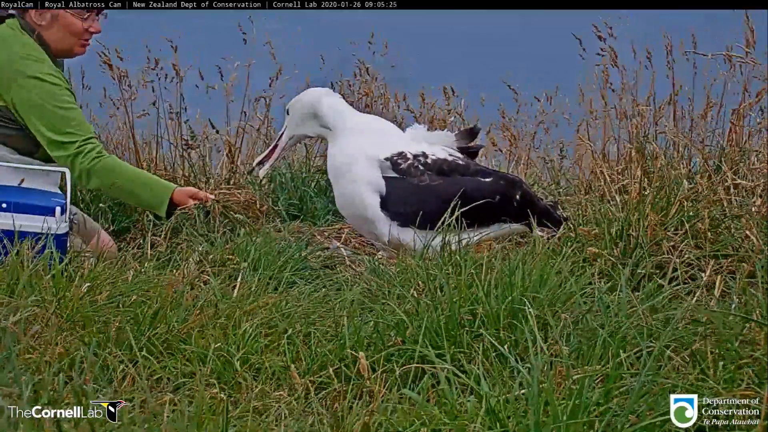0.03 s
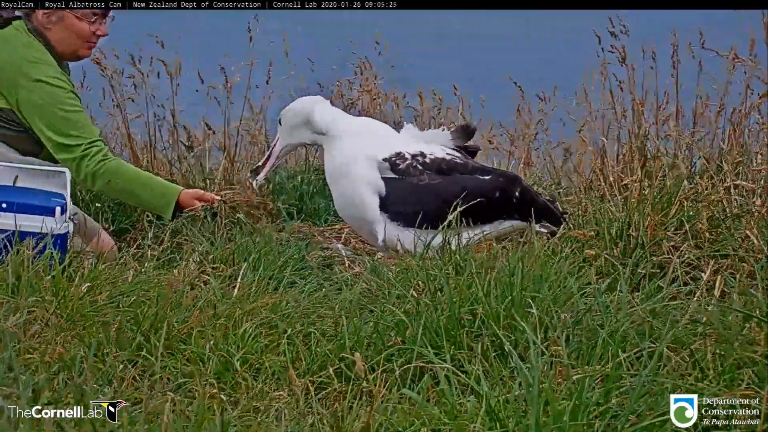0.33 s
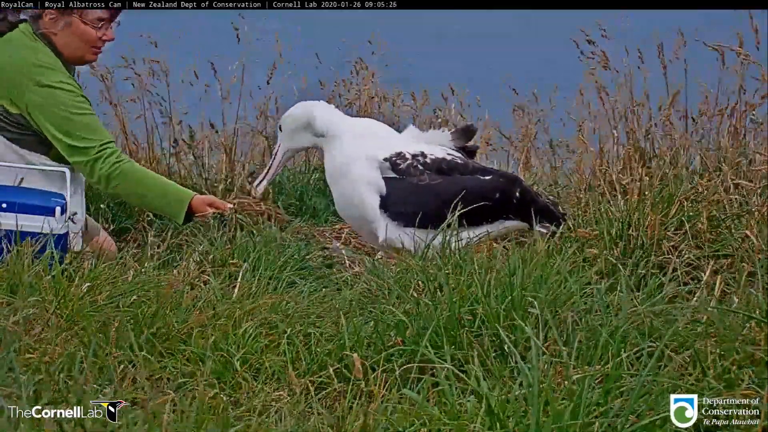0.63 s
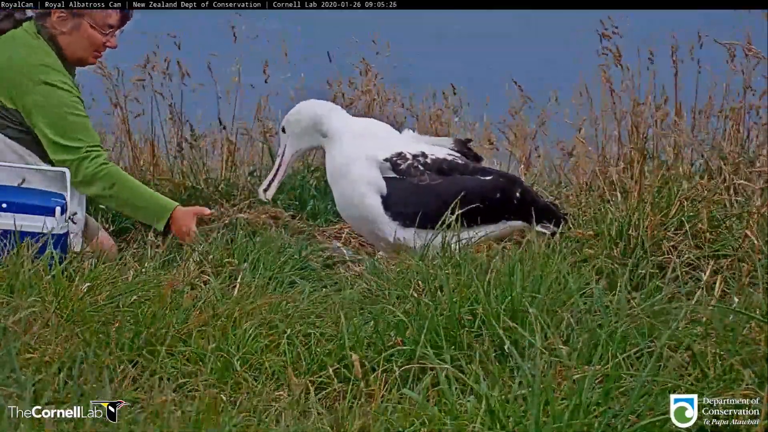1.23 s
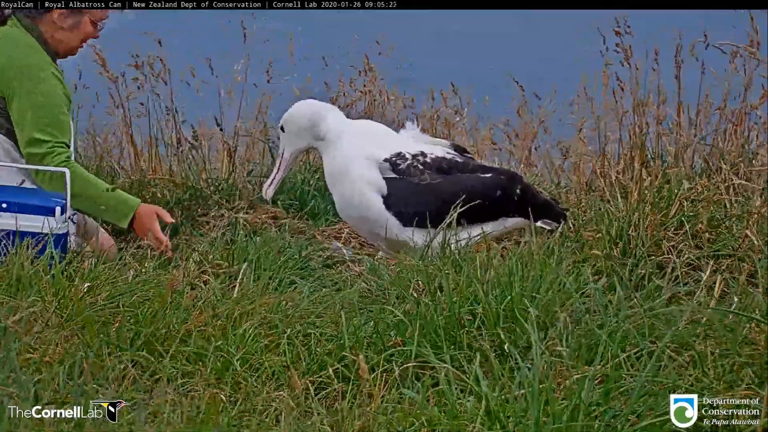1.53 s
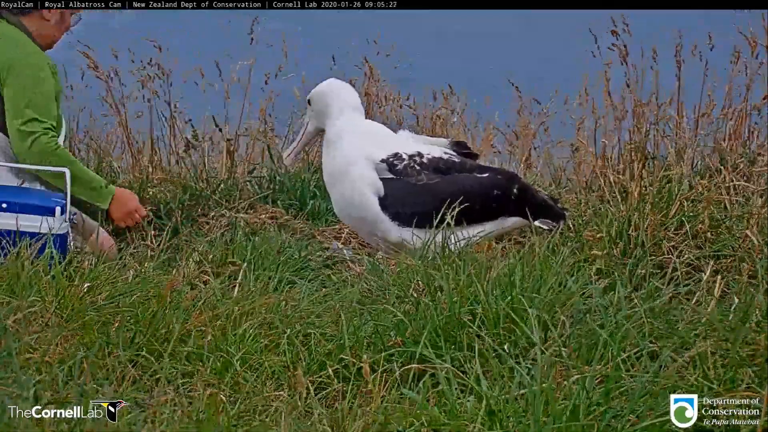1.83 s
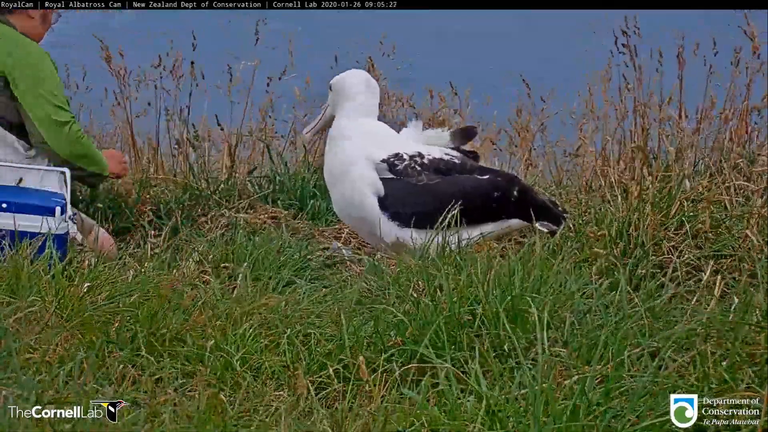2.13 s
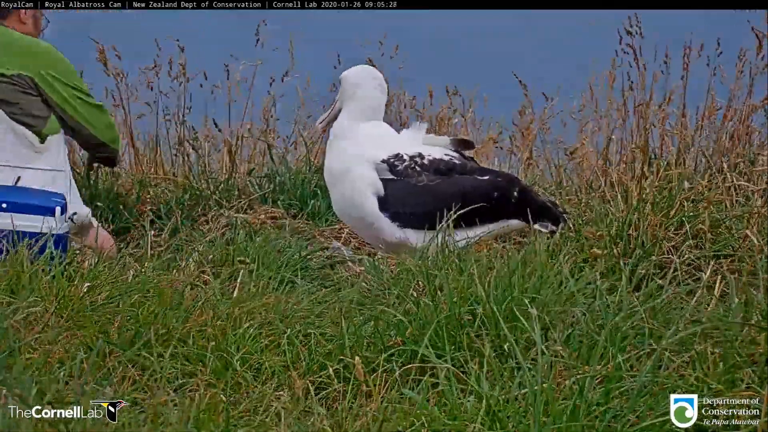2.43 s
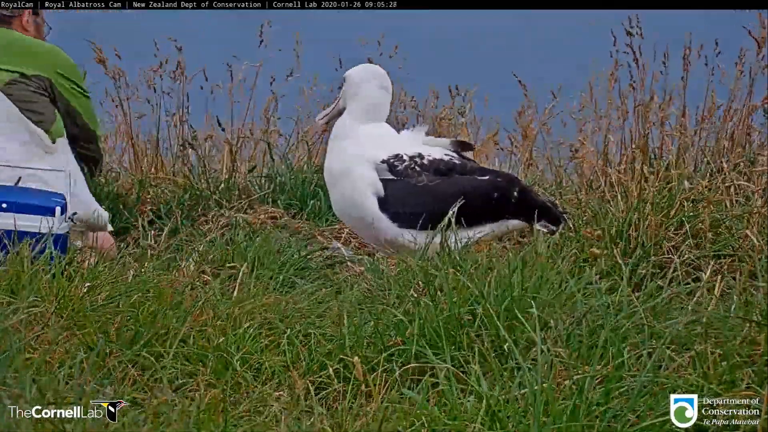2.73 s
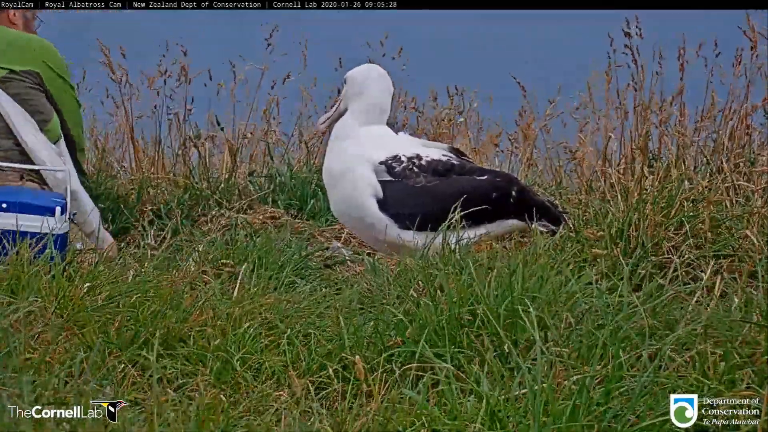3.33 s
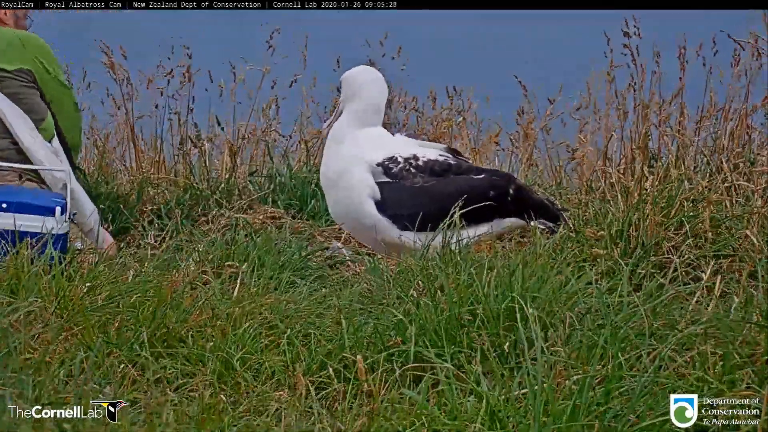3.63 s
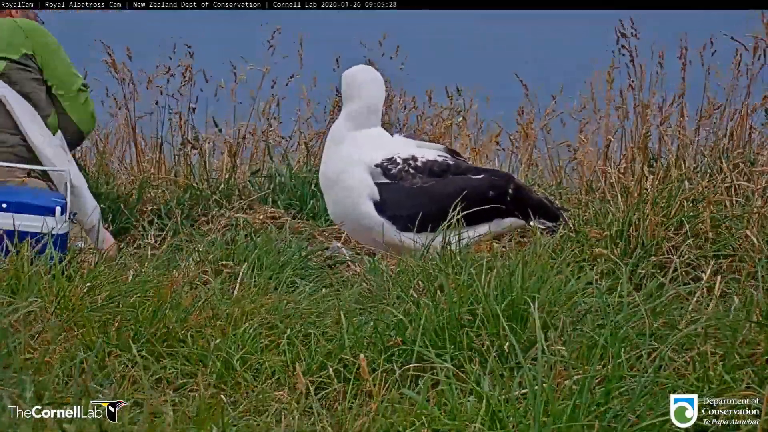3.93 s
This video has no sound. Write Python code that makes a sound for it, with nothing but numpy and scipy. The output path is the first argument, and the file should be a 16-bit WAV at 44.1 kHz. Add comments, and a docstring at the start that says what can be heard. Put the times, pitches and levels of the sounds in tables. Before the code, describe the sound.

An albatross holds one cracking note, then gives a quick run of twelve high, reedy honks, crossed once by a squeal. Light wind rumbles on the microphone on a grassy headland, with a faint, distant engine hum.

```python
"""Light wind on the microphone, a far engine's hum and a burst of hiss, out on a grassy headland.
An albatross holds one long note that cracks, then gives a quick run of twelve high, arching honks:
its syrinx sounds through throat and bill, reedy at first, then mostly on the even harmonics.
A far bird whistles twice, and once a higher squeal cuts across the run. The hiss comes and goes,
and towards the end a few dry grass stems tick."""
import sys
import numpy as np
from scipy import signal
from scipy.fft import rfft, irfft, next_fast_len
from scipy.io import wavfile
from scipy.ndimage import uniform_filter1d, map_coordinates

SR = 44100
rng = np.random.default_rng(int(sys.argv[2]) if len(sys.argv) > 2 else 0)


def digitize_waveform(pressure):
    """Quantize a signal to 16-bit integers and store it at the path in sys.argv[1].

    Rows of a 2-D input are taken as channels; values are limited to [-1, 1].
    """
    field = np.atleast_2d(pressure).T
    bounded = np.clip(field, -1, 1)
    quanta = np.round(bounded * 32767).astype(np.int16)
    wavfile.write(sys.argv[1], SR, quanta)


N = 176400

# Spectra of the noises around the microphone. Each row: frequency in Hz, relative level in dB.
BREEZE_COLOUR = [(65, -19.5), (110, -1.5), (230, -11), (448, -13), (626, -16), (1100, -17.5), (1700, -24.5),
                 (2340, -21.5), (2550, -26), (4720, -38.5), (6470, -47), (7320, -56.5)]
RUSTLE_COLOUR = [(130, -2), (450, 4), (800, -17), (3000, -51.5)]
RUMBLE_COLOUR = [(10, -7), (27, -1), (45, -3.5), (120, -15.5), (250, -32.5), (900, -38), (4000, -87.5)]
HISS_COLOUR = [(1500, -8.5), (3000, -12.5), (5000, -5), (6700, -10), (7400, -23)]
TICK_COLOUR = [(1500, -9), (4000, -5.0), (7000, -26)]
# Swells of wind and engine. Each row: centre in seconds, width in seconds, peak level in dB.
MIC_GUSTS = [(.54, 0.093, -40), (1.12, 0.052, -44.5)]
GRASS_RUSTLES = [(.56, 0.088, -61.5), (1.11, 0.1, -63.5), (1.92, 0.074, -65), (3.93, 0.14, -55.5)]
THIRD_HARMONIC_SWELL = [(3.87, 0.14, -58.5)]
# The far engine's tones. Each row: multiple of its speed, level in dB.
ENGINE_TONES = [(1, -52.5), (2, -66), (3, -65.5), (5, -74), (6.89, -71), (8, -75)]
# Bursts of hiss. Each row: start in seconds, length in seconds, level in dB.
HISS_BURSTS = [(0, .13, -70), (0.35, 0.016, -65), (0.422, 0.15, -67.5), (1.382, 0.072, -67),
               (1.793, 0.053, -67), (2.171, .035, -66), (2.476, .13, -67), (3.173, 0.0046, -57),
               (3.454, .021, -69.5), (3.793, 0.12, -66)]
# The albatross's fixed throat resonances. Each row: frequency in Hz, gain in dB.
THROAT = [(720, -27), (1100, -0.5), (1280, 1.5), (1450, -1.5), (1750, -5.5), (2000, -8.5), (2400, -10),
          (2620, -9), (2900, -11.5), (3300, -5.5), (3600, -13.5), (3850, -19.5), (4750, -15), (5200, -34),
          (5600, -29), (6700, -49.5)]
# The opening note. Each row: time in seconds, pitch in Hz, source level in dB,
# odd-harmonic gain in dB, treble gain in dB, roughness.
LONG_NOTE = [(.219, 585, -54, -14, -5, 0.3), (.244, 655, -53, 5, -5, 0.3), (.263, 706, -50, -2.5, -4.5, 0),
             (.311, 730, -50, -7.5, -0.5, 0), (0.352, 726, -52, -10, -10, 0),
             (0.402, 715.5, -51.5, -24, -2.5, 0), (0.415, 760, -56, -13, -33, 0.3),
             (0.469, 707, -54.5, -12, -21, 0.7), (0.552, 699, -68, -29, -22, 0.9),
             (.609, 769, -62, -15, -10.5, .5), (.643, 667, -53, -10, -6, .3),
             (.664, 590, -70, -25, -30, .3)]
# The cracked voice's second tone. Each row: time in seconds, pitch in Hz, level in dB.
CRACK = [(.4, 1956, -58), (.443, 1860, -63), (0.49, 1760, -62.5), (.56, 1740, -58.5), (.614, 1855, -60.5),
         (0.649, 1820, -69.5)]
# The far bird. Each row: start in seconds, first pitch in Hz, last pitch in Hz.
WHISTLES = [(.645, 4550, 4980), (0.897, 4870, 4730)]
# The arch of every honk. Each row: seconds from its start, pitch over top pitch, effort in dB,
# odd-harmonic gain in dB, bill resonance in Hz, roughness.
HONK_SHAPE = [(-.02, .83, -20.5, -8.5, 2100, 0), (.007, .85, -7, -1, 2226, .45),
              (.019, .905, -1, -1, 2100, 0.19), (.046, 0.97, -3, -5, 2090, 0.06),
              (.076, 1, 0.5, -8.5, 2100, 0), (.096, 0.93, 2, -12.5, 2900, 0.04),
              (.124, .922, 1.5, -28, 2997, .01), (.141, .872, -2.5, -8.5, 3700, 0),
              (.156, .73, -16, -0.5, 3550, 0.6)]
# The run of honks. Each row: start in seconds, top pitch in Hz, source level in dB,
# odd-harmonic gain in dB, treble gain in dB.
HONK_RUN = [(0.733, 742, -53.5, -2, -6), (0.989, 741.6, -49.5, 1, -7), (1.25, 735.4, -52, 0.5, -6.5),
            (1.514, 728, -52.5, -0.5, -6), (1.776, 718.5, -53.5, -1, -3.5), (2.038, 718, -54.5, 2.5, -0.5),
            (2.3, 716.5, -48.5, 0, -2.5), (2.561, 717, -47.5, -1, -4.5), (2.828, 702, -51.5, -7.5, -8),
            (3.095, 697.4, -53, -1, -3), (3.371, 695, -50.5, -1, -8), (3.665, 692, -48.5, -3.5, -5)]
# The tilt of each arch; later honks sag in pitch and swell. Each row: time in seconds,
# pitch drift in Hz a second, swell in dB a second.
HONK_TILT = [(1.102, 114, -11), (2.5, -230, 5.5)]
# The squeal. Each row: time in seconds, pitch in Hz, source level in dB, treble gain in dB, roughness.
SQUEAL = [(2.432, 808, -56.5, 4, 0.6), (2.461, 831, -58.5, 3, 0.2), (2.507, 869, -57.5, 7.5, 0),
          (2.514, 762, -55, -6, 0.5), (2.56, 708, -59, -2, 1.1), (2.625, 745, -51, -14, 0.3),
          (2.68, 756, -75, -6, 0.6)]
# Snapping stems. Each row: start in seconds, level in dB.
STEM_TICKS = [(3.531, -61), (3.56, -62.5), (3.593, -58.5), (3.875, -52)]


def amp(db):
    return 10 ** (np.asarray(db) / 20)


def unit_rms(x):
    return x / np.sqrt(np.mean(x ** 2) + 1e-20)


def along(points, hz):
    """Read (Hz, value) points on a log frequency axis."""
    freqs, values = np.transpose(points)
    return np.interp(np.log(hz + 1), np.log(freqs + 1), values)


def clock():
    return np.arange(N) / SR


def span(rows):
    """Sample times from the first row to the last."""
    return np.arange(rows[0][0], rows[-1][0], 1 / SR)


def curves(rows, t):
    """Each column after the time, with rounded corners."""
    times, *columns = np.transpose(rows)
    return [uniform_filter1d(np.interp(t, times, column), size=300) for column in columns]


def swells(rows):
    """Bell-shaped bumps of level."""
    return sum(amp(db) * np.exp(-.5 * ((clock() - centre) / width) ** 2) for centre, width, db in rows)


def wobble(rate, size=N):
    """A smooth random curve, rate knots a second."""
    return map_coordinates(rng.standard_normal(4000), [np.arange(size) * rate / SR], mode="mirror")


def filtered(x, response):
    """Shape x by a gain that depends on frequency."""
    size = next_fast_len(N + SR // 2)
    return irfft(rfft(x, size) * response(np.fft.rfftfreq(size, 1 / SR)), size)[:N]


def noise(colour):
    """Coloured noise of rms 1."""
    return unit_rms(filtered(rng.standard_normal(N), lambda hz: amp(along(colour, hz))))


def add(out, start, x):
    part = out[max(round(start * SR), 0):][:len(x)]
    part += x[:len(part)]


def wind(breeze_db=-57.5, flutter_db=.9, rumble_db=-52):
    """A breeze rustles the grass, rumbles on the microphone and bumps it with two gusts."""
    breeze = noise(BREEZE_COLOUR) * amp(breeze_db + flutter_db * wobble(25.07))
    rustles = swells(GRASS_RUSTLES) * noise(RUSTLE_COLOUR)
    rumble = (amp(rumble_db) + swells(MIC_GUSTS)) * noise(RUMBLE_COLOUR)
    return breeze + rustles + rumble


def far_engine(speed_hz=67.13, wander=.00494, sway_db=2, whine_hz=5890, whine_db=-92):
    """An engine a long way off: low tones that fade and swell, and a faint high whine."""
    turns = np.cumsum(speed_hz * (1 + wander * wobble(5))) / SR
    hum = np.zeros(N)
    for multiple, db in ENGINE_TONES:
        level = amp(db + sway_db * wobble(11)) + (multiple == 3) * swells(THIRD_HARMONIC_SWELL)
        hum += level * np.sin(2 * np.pi * multiple * turns + .45 * wobble(9.4))
    whine = amp(whine_db) * np.sin(2 * np.pi * whine_hz * clock() + wobble(60))
    return np.sqrt(2) * (hum + whine)  # the levels are rms


def hisses(edge_s=.028, grain_db=2, flutter_db=1):
    """Short, grainy, uneven bursts of treble noise."""
    t, gate = clock(), np.zeros(N)
    for start, length, db in HISS_BURSTS:
        inside_s = np.minimum(t - start, start + length - t)
        gate += amp(db) * np.clip(inside_s / edge_s + .5, 0, 1)
    return gate * unit_rms(noise(HISS_COLOUR) * amp(grain_db * wobble(500) + flutter_db * wobble(58)))


def syrinx(pitch, levels_db, rough, jitter=.0027, rasp_from_hz=2300, haze_db=-24, flicker_db=2.5):
    """Harmonics of one unsteady vibration in a hoarse haze; roughness smears the high ones most."""
    n = len(pitch)
    phase = 2 * np.pi * np.cumsum(pitch * (1 + jitter * wobble(300, n))) / SR
    out = np.zeros(n)
    for k, db in enumerate(levels_db, 1):
        height = (k * pitch / rasp_from_hz) ** 2
        rasp_share = np.clip(rough * (.5 + height), 0, 1)
        rasp = wobble(330, n) + 1j * wobble(330, n)
        haze = amp(haze_db) * (wobble(900, n) + 1j * wobble(900, n))
        modulation = np.sqrt(2 * (1 - rasp_share)) + np.sqrt(rasp_share) * rasp + haze
        gain = amp(db + flicker_db * np.minimum(height, 1) * wobble(30, n))
        out += gain * np.imag(modulation * np.exp(1j * k * phase))
    return out * signal.windows.tukey(n, .05)


def voice(pitch, db, odd_db, treble_db, rough, bill_hz, bill_db=7.5, bill_width_hz=306):
    """The syrinx heard through the fixed throat and the movable bill resonance."""
    def colour(hz):
        bill = bill_db * np.exp(-.5 * ((hz - bill_hz) / bill_width_hz) ** 2)
        treble_shelf = treble_db * along([(1750, 0), (2800, 1)], hz)
        return along(THROAT, hz) + bill + treble_shelf
    return syrinx(pitch, [db + colour(k * pitch) + k % 2 * odd_db for k in range(1, 11)], rough)


def opening_note():
    """The albatross holds a note that cracks into two unrelated pitches."""
    out = np.zeros(N)
    add(out, LONG_NOTE[0][0], voice(*curves(LONG_NOTE, span(LONG_NOTE)), bill_hz=2100))
    pitch, db = curves(CRACK, span(CRACK))
    add(out, CRACK[0][0], syrinx(pitch, [db], rough=.22))
    return out


def hillside(calls, scatter_db=-13.5, t60_s=.17):
    """The calls reach the microphone directly, with a short scatter off the slope behind them."""
    t = np.arange(SR // 4) / SR
    tail = rng.standard_normal(len(t)) * amp(-60 * t / t60_s)
    return calls + amp(scatter_db) * signal.fftconvolve(calls, tail / np.linalg.norm(tail))[:N]


def far_bird(length_s=.05, db=-81.5):
    """Two thin, gliding whistles from far off."""
    out = np.zeros(N)
    for start, first_hz, last_hz in WHISTLES:
        pitch = np.linspace(first_hz, last_hz, round(length_s * SR))
        add(out, start, syrinx(pitch, [db], rough=0))
    return out


def honks():
    """Arches of pitch and effort, nearly four a second; the bill resonance climbs as the pitch falls."""
    out, t = np.zeros(N), span(HONK_SHAPE)
    arch, effort_db, odd_shape_db, bill_hz, rough = curves(HONK_SHAPE, t)
    from_top_s = t - t[np.argmax(arch)]
    tilt_times, drifts, swell_rates = np.transpose(HONK_TILT)
    for start, top_hz, db, odd_db, treble_db in HONK_RUN:
        pitch = arch * (top_hz + np.interp(start, tilt_times, drifts) * from_top_s)
        level_db = db + effort_db + np.interp(start, tilt_times, swell_rates) * from_top_s
        add(out, start + t[0], voice(pitch, level_db, odd_shape_db + odd_db, treble_db, rough, bill_hz))
    return out


def squeal():
    """A thinner, higher call that trails off hoarsely and beats against the next honk."""
    out = np.zeros(N)
    pitch, db, treble_db, rough = curves(SQUEAL, span(SQUEAL))
    add(out, SQUEAL[0][0], voice(pitch, db, 0, treble_db, rough, bill_hz=2550))
    return out


def stem_ticks(decay_s=.004):
    """Dry stems snap softly in the grass."""
    t = clock()
    snaps = sum(amp(db) * (t > start) * np.exp(-np.abs(t - start) / decay_s) for start, db in STEM_TICKS)
    return snaps * noise(TICK_COLOUR)


def scene():
    """The headland from one spot, in mono."""
    background = wind() + far_engine() + hisses()
    calls = hillside(opening_note() + honks() + squeal())
    return (background + calls + far_bird() + stem_ticks())[None]


def record(dry, top_hz=7400, edge_hz=200):
    """The microphone keeps nothing above its band limit."""
    return np.array([filtered(x, lambda hz: np.clip((top_hz - hz) / edge_hz + .5, 0, 1)) for x in dry])


dry = scene()
out = record(dry)
digitize_waveform(out)
```